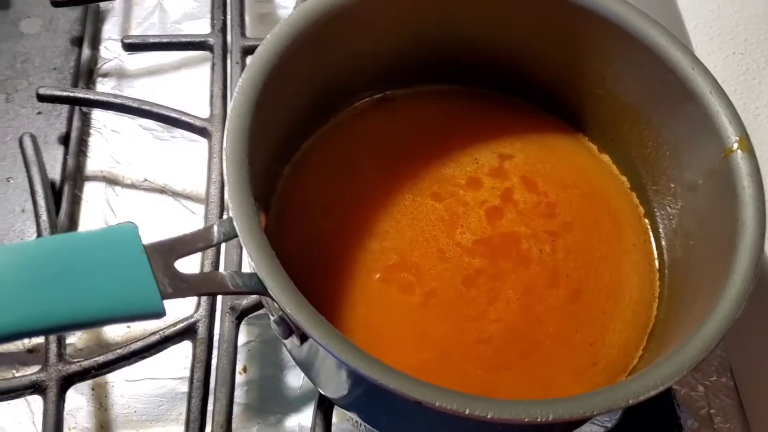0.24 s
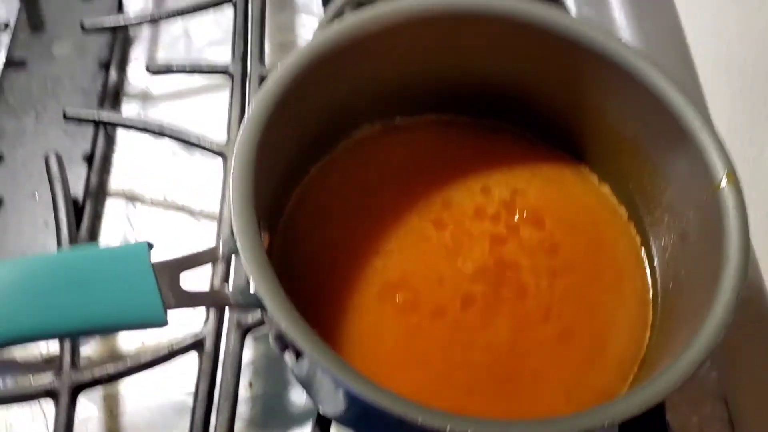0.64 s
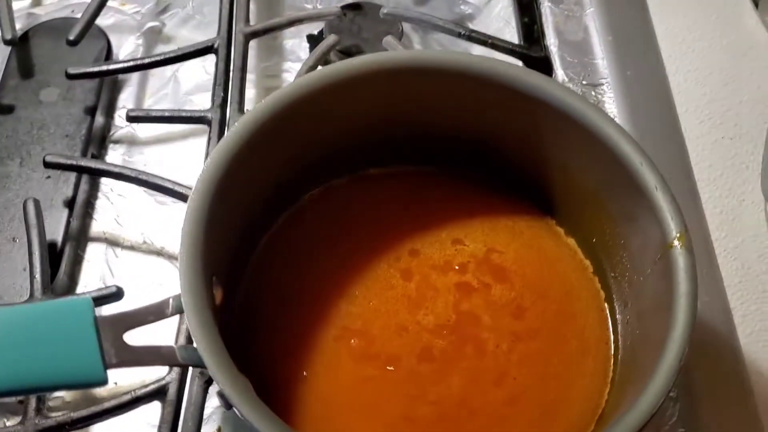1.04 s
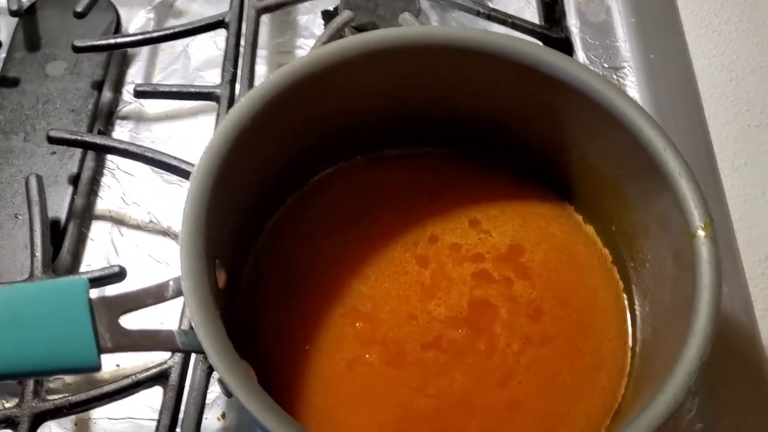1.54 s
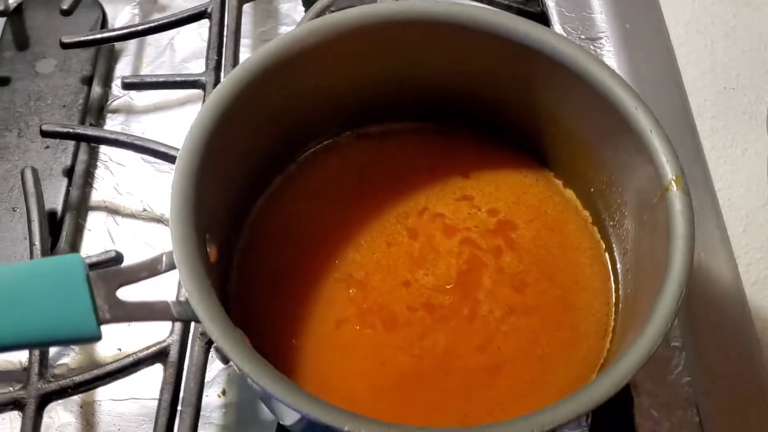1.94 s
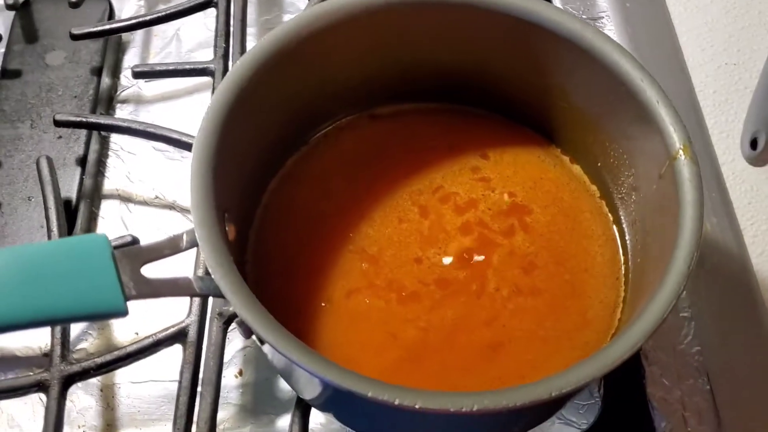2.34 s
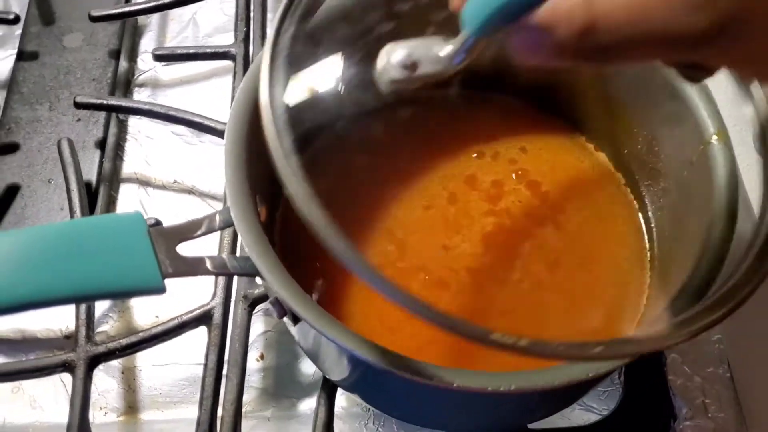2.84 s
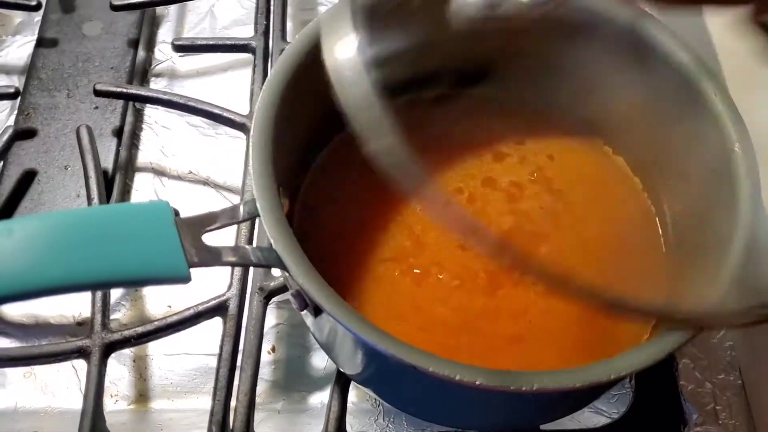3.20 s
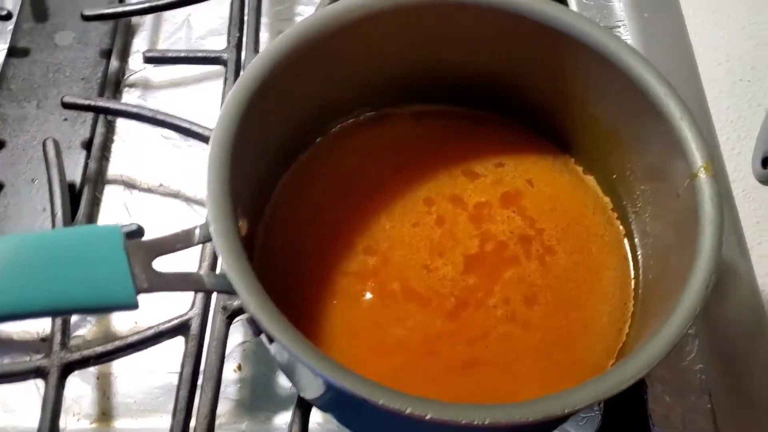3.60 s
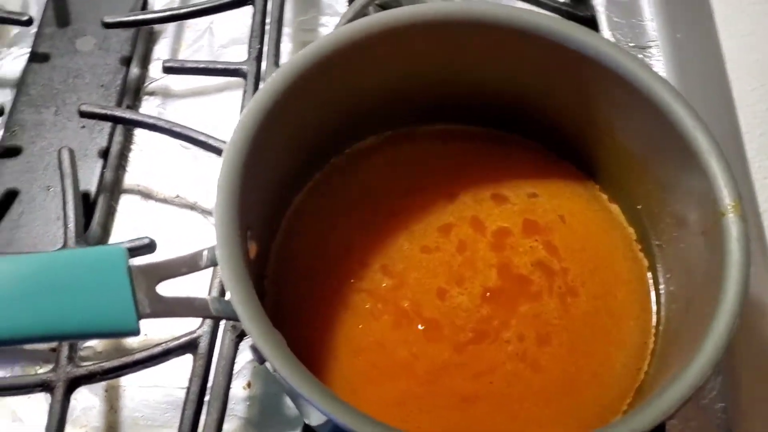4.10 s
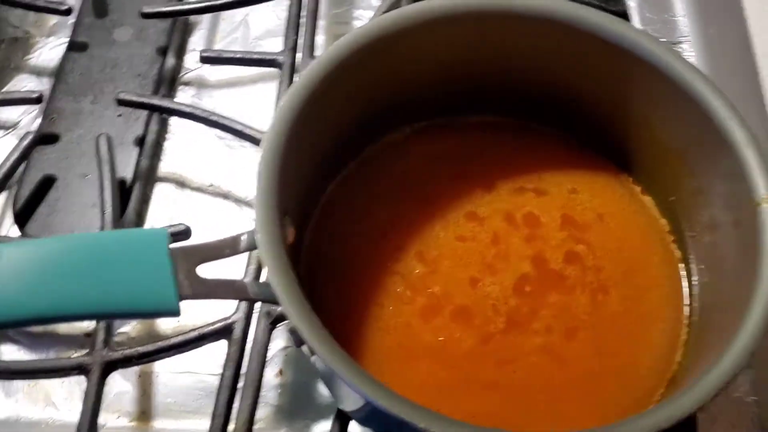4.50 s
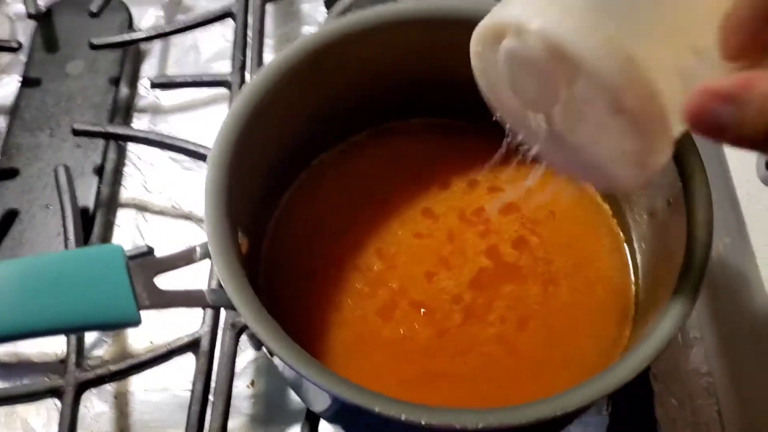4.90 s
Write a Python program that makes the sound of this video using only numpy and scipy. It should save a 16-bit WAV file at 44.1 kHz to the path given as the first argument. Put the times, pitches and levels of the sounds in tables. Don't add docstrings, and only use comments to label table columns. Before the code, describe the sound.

Cupboard hinge squeaks faintly, jars knock on a hollow worktop, a glass lid lands with loud clattering, then dry seasoning is shaken in quick bursts.

```python
import sys
import numpy as np
from scipy import signal
from scipy.fft import rfft, irfft, next_fast_len
from scipy.io import wavfile
from scipy.ndimage import uniform_filter1d, map_coordinates

SR = 44100
rng = np.random.default_rng(int(sys.argv[2]) if len(sys.argv) > 2 else 0)


def put_to_file(sound):
    columns = np.atleast_2d(sound).T
    safe = np.clip(columns, -1, 1)
    whole_steps = np.round(safe * 32767)
    wavfile.write(sys.argv[1], SR, whole_steps.astype(np.int16))


def volts(x):
    e = np.asarray(x, float) / 20
    return 10 ** e


N = 227115


def unit(x):
    return x / np.sqrt(np.mean(x ** 2) + 1e-20)


def along(points, hz):
    f, v = np.transpose(points)
    return np.interp(np.log(hz + 1), np.log(f + 1), v)


def curves(rows):
    s, *cols = np.transpose(rows)
    return [np.interp(np.arange(N) / SR, s, c) for c in cols]


def during(rows, fade=0.054):
    first, last = rows[0][0], rows[-1][0]
    return np.interp(np.arange(N) / SR, [first - fade, first, last, last + fade], [0, 1, 1, 0])


def wobble(rate):
    coarse = np.arange(0, N + 64, 64)
    knots = rng.standard_normal(int(N * rate / SR) + 4)
    return np.interp(np.arange(N), coarse, map_coordinates(knots, [coarse * rate / SR]))


def shaped(x, spectrum):
    m = next_fast_len(x.shape[-1] + 8192)
    gain = volts(along(spectrum, np.fft.rfftfreq(m, 1 / SR)))
    return irfft(rfft(x, m) * gain, m)[..., :x.shape[-1]]


def coloured(x, spectrum):
    return unit(shaped(x, spectrum))


def rippled(spectrum, depth_db, apart_hz):
    hz = np.arange(apart_hz, SR / 2, apart_hz)
    return np.transpose([hz, along(spectrum, hz) + depth_db * rng.standard_normal(len(hz))])


def pair(n, alike):
    a, b = rng.standard_normal((2, n))
    turn = np.arccos(np.clip(alike, -1, 1)) / 2
    shared, differing = np.cos(turn) * a, np.sin(turn) * b
    return np.array([shared + differing, shared - differing])


def rush(spectrum, alike, patchy_db):
    z = signal.stft(pair(N, alike), nperseg=512)[2]
    field = uniform_filter1d(rng.standard_normal(z.shape[1:]), 6, 0)
    field = uniform_filter1d(field, 10, 1)
    patched = signal.istft(z * volts(patchy_db * unit(field)), nperseg=512)[1][:, :N]
    return coloured(patched, spectrum)


def swells(rows, edge, linger=1.22):
    s, half, db = np.transpose(rows)[:, :, None]
    coarse = np.arange(0, N + 64, 64)
    away = (coarse / SR - s) / half
    strokes = volts(db) * np.exp(-np.maximum(-away, away / linger) ** edge)
    return np.interp(np.arange(N), coarse, np.sum(strokes, axis=0))


def add(out, s, sound, pan_db):
    out[:, round(s * SR):][:, :sound.shape[1]] += sound * volts([[pan_db / 2], [-pan_db / 2]])


def ringing(modes, t, spread, scatter_db):
    hz, db, t60 = np.transpose(modes)
    draw = rng.standard_normal((4, len(modes)))
    swing = np.exp(np.outer(2j * np.pi * hz * (1 + 0.014 * draw[0]) - np.log(1000) / t60, t))
    phase = 0.65 * draw[3] + spread * (1 + 0.36 * draw[2]) * [[-1], [1]]
    ring = (volts(db + scatter_db * draw[1]) * np.exp(1j * phase) @ swing).imag
    return ring / np.abs(ring).max()


def room(x):
    # frequency_hz, t60_s
    walls = [(150, 0.19), (600, 0.25), (3000, 0.21), (12000, 0.1)]
    out, step = np.zeros((2, N + SR)), SR // 5
    for start in range(0, N, step):
        hz, t, z = signal.stft(pair(SR // 3, 0.75), SR, nperseg=256)
        decay = volts(-60 * t / along(walls, hz)[:, None])
        tail = signal.istft(z * decay, SR, nperseg=256)[1]
        wet = signal.fftconvolve(x[:, start:start + step], tail / np.linalg.norm(tail[0]), axes=1)
        add(out, start / SR + .004, wet, 0)
    return out[:, :N]


def hum():
    # frequency_hz, density_db (per Hz)
    rumble_spectrum = [(13, -27), (22, -19.5), (33, -9.5), (54, 4), (121, -6), (150, -23), (200, -18),
                       (330, -120)]
    # frequency_hz, density_db (per Hz)
    drone_spectrum = [(88, -56), (150, -11.5), (198, -18.5), (236, -3.5), (461, -5.5), (486, -7.5),
                      (641, -8.5), (750, -10.5), (1200, -26.5), (1560, -22.5), (2640, -120)]
    # middle_s, half_length_s, rumble_db, drone_db
    shudders = [
        (2.083, 0.15, -71, -74),
        (3.15, 0.18, -66, -64.5),
        (3.793, 0.12, -55, -43.5),
    ]
    steady_db = -64
    deep = volts(steady_db) + swells([(s, half, db) for s, half, db, _ in shudders], edge=1.8)
    boxy = volts(steady_db) + swells([(s, half, db) for s, half, _, db in shudders], edge=2.4)
    rumble = deep * volts(2.5 + 0.84 * wobble(4.13)) * coloured(pair(N, 0.97), rumble_spectrum)
    drone = boxy * volts(2 + 1.5 * wobble(4.8)) * rush(drone_spectrum, 0.76, patchy_db=2.0)
    return (rumble + drone) * volts([[-.8], [.8]])


def hands():
    # middle_s, half_length_s, level_db
    brush = [(.25, .04, -73), (.47, 0.083, -63.5), (.65, 0.11, -62.5), (1.52, 0.066, -59.5),
             (2.39, 0.054, -67.5), (2.89, 0.051, -67), (3.41, 0.039, -54), (4.12, 0.13, -66),
             (4.3, 0.047, -66), (4.375, 0.022, -54.5), (4.448, 0.024, -53.5)]
    # frequency_hz, density_db (per Hz)
    cloth = [(2650, -39), (4500, -11.5), (6770, -4), (7570, -3), (8550, -10.5), (11500, -4.5),
             (14900, -10.5), (16000, -1)]
    # middle_s, half_length_s, level_db
    scuffs = [(.92, 0.039, -50), (1.42, 0.15, -70.5), (2.15, 0.035, -51), (2.39, 0.084, -79),
              (3.4, 0.18, -71), (3.75, 0.081, -47.5), (3.91, 0.052, -56.5), (4.78, 0.32, -66)]
    # frequency_hz, density_db (per Hz)
    scuff_spectrum = [(530, -14.5), (900, -11), (967, -3.5), (1350, -5), (2570, -7), (2800, -1.5),
                      (3190, -6.5), (4450, -14.5), (5140, -18), (12300, -29.5), (15600, -29)]
    steady_db = -68.5
    hiss = swells(brush, edge=1.7) * volts(0.5 + 0.74 * wobble(31)) * rush(cloth, 0, patchy_db=2)
    scuffing = (volts(steady_db) + swells(scuffs, edge=1.63)) * volts(5.5 + 0.57 * wobble(26.1))
    dull = rush(rippled(scuff_spectrum, depth_db=1.3, apart_hz=93.0), 0, patchy_db=3.0)
    return hiss + scuffing * dull


def ticks():
    # start_s, peak_db, pitch_hz
    pops = [(0.169, -47.5, 850), (0.31, -50, 750), (0.361, -47.5, 1070), (0.503, -39.5, 770),
            (0.537, -46.5, 900), (1.201, -51.5, 900), (1.268, -52, 704), (1.303, -37, 1020),
            (2.379, -47, 770), (3.472, -48, 730), (4.342, -41, 742)]
    # start_s, peak_db, lowest_resonance_hz, width_octaves
    grit = [(0.018, -45, 1250, 0.34), (0.025, -44.5, 1390, 1.23), (0.095, -50.5, 1290, 1.2),
            (0.105, -57, 1420, 0.76), (0.23, -56, 2160, 0.85), (1.197, -58, 975, 1),
            (1.26, -30.5, 1350, 0.52), (1.266, -42.5, 2690, 0.58), (1.281, -38.5, 1350, 0.92),
            (1.298, -33, 1300, 0.52), (1.295, -47, 2900, 0.3), (1.337, -42.5, 2900, 0.4),
            (1.338, -37.5, 1300, 0.32), (1.359, -46.5, 1700, 0.27), (2.613, -43, 1760, 0.74),
            (2.633, -48, 2500, 0.25), (2.641, -53, 2490, 0.25), (3.002, -51, 2300, 0.6),
            (3.288, -57, 1220, 0.56), (4.36, -43.5, 2660, 1.14)]
    # start_s, peak_db, lowest_hz, width_octaves
    snaps = [(.248, -63, 6500, .8), (0.438, -38.5, 7800, 0.2), (1.116, -64, 6040, 0.84),
             (1.3245, -39, 13500, 0.34), (1.862, -32.5, 8360, 0.2), (1.336, -46, 12700, 0.42),
             (1.325, -47.5, 9540, 0.12), (1.817, -56, 14000, .3), (1.842, -47, 6000, 1.3),
             (1.8615, -52, 12000, .5), (1.9, -52, 4040, 1.1), (1.921, -58, 13000, .35),
             (2.197, -47, 8050, .9), (2.592, -58, 7320, 0.17), (2.742, -68, 12000, .5),
             (3.394, -55, 9000, .6), (3.6693, -30.5, 7900, 2.8), (3.699, -33, 7960, 1),
             (3.816, -21.5, 9450, 1), (3.841, -21, 6060, 1.3), (3.002, -47, 3020, 0.48),
             (0.8162, -48, 5000, 1.2), (2.069, -59, 11000, 1), (2.241, -52, 6500, 0.61),
             (2.4857, -56, 8000, .3), (2.592, -55, 12700, .25), (2.613, -54, 12400, .3),
             (2.617, -52, 5460, 0.46), (2.622, -53, 6460, 1.2), (2.689, -55.5, 5600, 1.6),
             (2.981, -63, 5000, 1.1), (3.383, -48, 11500, 1.4), (3.516, -54.5, 6200, 0.88),
             (4.364, -44, 6950, 0.44), (4.4438, -50, 10100, 1)]
    # start_s, peak_db, lowest_hz, width_octaves, length_s
    slides = [(2.087, -43, 400, 0.2, 0.28), (1.262, -42.5, 1460, 1.07, 0.42),
              (2.879, -66, 1383, 0.037, 0.66), (3.004, -44.5, 338, 2.16, 0.12),
              (3.183, -48.5, 1250, 0.92, 0.26), (3.255, -55, 1200, 0.59, 0.53),
              (3.496, -62, 2270, 0.089, 0.37)]
    grit_cycles, snap_s = 84, 0.014
    out, t = np.zeros((2, N + SR)), np.arange(SR // 5) / SR
    front = np.sin(np.pi * np.clip(t / 0.00085, 0, .5))
    for s, db, hz in pops:
        pop = ringing([(hz, 0, .025)], t, spread=0.41, scatter_db=5.5)
        add(out, s, volts(db) * front * pop, -4)
    short = [(*row, grit_cycles / row[2]) for row in grit] + [(*row, snap_s) for row in snaps]
    for s, db, hz, width, length in short + slides:
        skirt = [(-.9, -40), (-.4, -6), (0, 0), (1, -4), (1.39, -20), (1.9, -45), (3.2, -75)]
        band = [(hz * 2 ** (widths * width), level_db) for widths, level_db in skirt]
        burst = coloured(pair(len(t), 0.1297), rippled(band, depth_db=4.0, apart_hz=0.062 * hz))
        rise = 1 - np.exp(-t / (0.037 * length))
        add(out, s, volts(db + 4 - 60 * t / length) * burst * rise, -3)
    return out[:, :N]


def hinge():
    # multiple_of_slip_rate, level_db
    overtones = [(1, -9), (2, -14), (3, -11), (4, -10), (5, 9), (6, -8), (7, -6), (8, -3), (9, -3),
                 (10, -11), (11, -11), (12, -2), (13, -10), (16, -25)]
    # time_s, pitch_hz, level_db
    squeaks = [
        [(0.355, 2590, -75), (0.398, 2545, -64), (0.435, 2520, -67), (0.476, 2505, -60), (0.5, 2495, -67),
         (0.535, 2485, -73)],
    ]
    hz, db = curves(np.vstack(squeaks))
    turns = np.cumsum(hz / 5 * (1 + .007 * wobble(90))) / SR
    brighten_db = 9 * (np.arange(N) / SR - .48).clip(-.15, .05)
    tone = 0
    for k, level_db in overtones:
        swell = volts(level_db + brighten_db * (k - 5) + 4 * wobble(30))
        tone = tone + swell * np.sin(2 * np.pi * k * turns)
    moving = sum(during(squeak, fade=0.03) for squeak in squeaks)
    return tone * volts(db) * moving * volts([[-1.5], [1.5]])


def whistles():
    # middle_s, half_length_s, level_db, centre_hz, width_octaves
    cap_holes = [(4.603, .03, -51, 4730, .08), (4.638, 0.045, -58, 1250, 0.2),
                 (4.767, 0.022, -57, 2500, .08), (4.829, 0.025, -48.5, 1340, 0.073),
                 (4.834, 0.019, -42.5, 2690, 0.13), (4.907, 0.019, -46, 5480, .04),
                 (4.898, 0.014, -47, 2850, .06), (4.918, 0.015, -48.5, 3290, .06),
                 (5.045, .02, -50, 2100, .08), (5.055, 0.02, -49, 3500, .05)]
    # middle_s, half_length_s, level_db, centre_hz, width_octaves
    chatter = [(0.829, 0.017, -45.5, 1090, 0.29), (0.97, 0.01, -50, 1240, 0.22),
               (2.6, 0.019, -56, 130, 0.28), (3.3, 0.044, -58, 125, 0.22), (3.4, 0.039, -54, 380, 0.39),
               (3.683, .01, -34, 1600, 0.28), (3.715, 0.013, -34, 1600, 0.38),
               (3.75, 0.018, -38.5, 1530, 0.31), (3.826, .012, -35, 1900, .25),
               (3.85, 0.018, -27.5, 1500, .35), (3.685, 0.018, -23.5, 230, 0.5),
               (3.915, 0.03, -32.5, 700, .4), (2.39, .035, -60, 3360, 0.58), (.9, 0.019, -30, 640, 0.3),
               (3.015, 0.015, -47, 810, 0.52), (0.425, 0.087, -63, 310, 0.45)]
    out = np.zeros((2, N))
    for s, half, db, hz, width in cap_holes + chatter:
        skirt = [(-3, -45), (-1, -6), (0, 0), (1, -6), (3, -45)]
        band = [(hz * 2 ** (widths * width), level_db) for widths, level_db in skirt]
        noise = pair(N, np.clip(350 / hz, 0.3, .95))
        out = out + swells([(s, half, db)], edge=2.3) * coloured(noise, band)
    return out


def clinks():
    # start_s, peak_db, pitch_hz, t60_s
    clicks = [(.438, -46, 5200, 0.022), (.438, -45, 6550, .02), (1.265, -29, 2740, 0.016),
              (1.2685, -29.5, 1560, .03), (1.293, -39, 2150, .03), (1.3373, -25.5, 2950, 0.013),
              (2.6095, -46, 3000, .012), (2.6117, -37.5, 2770, .014), (2.6133, -26.5, 2830, 0.015),
              (2.6165, -33, 2950, .02), (2.6195, -39, 1860, 0.028), (2.6257, -28.5, 2790, 0.017),
              (2.6298, -33, 2640, .016), (3.003, -42, 3150, 0.039), (3.186, -48, 1900, .02),
              (.4375, -40, 12200, 0.0056), (.4375, -41, 14600, .006), (1.316, -36, 300, 0.038),
              (.8825, -12, 513, 0.041), (.891, -17, 430, .04), (3.0035, -26, 420, .04),
              (3.699, -7.5, 457, .04), (3.7385, -14.5, 620, .04), (1.845, -18.5, 341, 0.087),
              (2.9525, -49, 900, .03), (1.271, -44, 3900, .02)]
    out, t = np.zeros((2, N + SR)), np.arange(SR // 10) / SR
    front = 1 - np.exp(-t / 0.00034)
    for s, db, hz, t60 in clicks:
        ring = ringing([(hz, 0, t60), (1.12 * hz, -10, t60)], t, spread=0.36, scatter_db=6.0)
        add(out, s, volts(db) * front * ring, -3)
    return out[:, :N] + room(volts(-12.5) * out[:, :N])


def notes():
    # start_s, peak_db, pitch_hz, t60_s, rise_s
    jar_notes = [(0.73, -44.5, 250, 0.099, 0.0025), (.729, -46, 544, 0.04, .003),
                 (0.767, -47, 242, 0.091, .004), (.815, -27.5, 203, 0.1, .004),
                 (.817, -27.5, 529.3, 0.23, 0.008), (.891, -10.5, 593, 0.021, 0.0011),
                 (.895, -33, 382, 0.33, 0.0046), (.955, -22.5, 526, 0.078, 0.0035),
                 (.98, -42, 545, 0.08, .004), (1.268, -43.5, 712, 0.26, 0.0066),
                 (1.709, -37, 137, .15, 0.0083), (1.775, -30.5, 718, 0.052, 0.0024),
                 (1.82, -32, 1485, 0.057, .002), (1.853, -25, 1460, 0.064, 0.0025),
                 (1.875, -43, 386.4, .35, 0.0085)]
    # start_s, peak_db, pitch_hz, t60_s, rise_s
    pot_notes = [(2.952, -56, 1250, 0.037, .001), (3.0035, -27, 350, 0.16, 0.0011),
                 (3.0035, -27.5, 440, 0.074, .001), (3.004, -35, 290, 0.18, 0.001),
                 (3.004, -36.5, 584, 0.092, 0.00093), (3.005, -43, 1166, .12, 0.0023),
                 (3.004, -38.5, 1297, 0.11, .002), (3.003, -43, 2600, 0.056, 0.0009),
                 (3.041, -39, 117, 0.25, 0.033), (3.185, -53, 1520, .08, .002)]
    # start_s, peak_db, pitch_hz, t60_s, rise_s
    lid_notes = [(3.669, -12, 836, 0.071, .002), (3.669, -18.5, 6150, 0.025, .001),
                 (3.676, -24, 1653, 0.04, .003), (3.699, -14, 864, 0.088, .002),
                 (3.738, -14, 815, 0.052, .001), (3.791, -24, 1530, 0.047, .002),
                 (3.807, -16.5, 724, 0.072, .001), (3.815, -22.5, 1880, 0.065, .003),
                 (3.841, -3, 549, 0.05, .001), (3.843, -20, 1720, 0.032, .001),
                 (3.842, -17, 1077, 0.043, .001), (3.88, -22, 1487, 0.12, .006),
                 (3.901, -37, 382.5, 0.25, .01), (3.885, -17.5, 707, 0.12, .004)]
    out, t = np.zeros((2, N + SR)), np.arange(SR // 3) / SR
    for s, db, hz, t60, rise in jar_notes + pot_notes + lid_notes:
        ring = ringing([(hz, 0, t60), (1.03 * hz, -9, t60)], t, spread=0.3, scatter_db=2.0)
        add(out, s, volts(db) * (1 - np.exp(-t / rise)) * ring, -2.5)
    return out[:, :N] + room(volts(-10.5) * out[:, :N])


def contacts():
    # start_s, body_peak_db, thud_db, rim_db, clatter_db
    jars = [(.73, -43, -15, -26, -14), (0.748, -47, 0, -23, -7), (.816, -30, -4.5, -7, -7),
            (0.838, -31, -9, -2, -11.5), (0.862, -26, 1.5, -4, -12), (.882, -11, -9.5, -2.5, -19),
            (.903, -26, 1, -5, -10), (.924, -25, -4, -28, -31), (.942, -18, -5, -7.5, -21.5),
            (1.315, -42, -4.5, 3, -5), (1.593, -38.5, 7, -28, -28), (1.727, -27, 1, -18, -33),
            (1.744, -42, -11, -9, -32), (1.778, -23, -3.5, -14, -24), (1.793, -36, -2, -22, -17),
            (1.81, -29, 4, -12, -13), (1.826, -17, -9, -11.5, -15.5), (1.843, -11, -8.5, -13, -17.5),
            (1.861, -22, -8, -7.5, -5), (2.141, -12.5, -12.5, -3.5, -28), (2.159, -21.5, -3, -5.5, -15.5),
            (2.168, -33, 0.5, 10, -7.5), (2.197, -23.5, -5.5, -0.5, -12.5), (2.218, -34.5, 3, -11, -18)]
    # start_s, body_peak_db, thud_db, rim_db, clatter_db
    pot = [
        (2.952, -44, -14, -9, -28),
        (3.003, -24.5, -6, -11, -23.5),
        (3.035, -39, -1, -12, -43),
        (3.062, -55, -7.5, -25, -37),
    ]
    # start_s, body_peak_db, thud_db, rim_db, clatter_db
    lid = [(3.669, -2, -11, -9.5, -17.5), (3.699, -8.5, -8, -6, -16), (3.719, -19, -5, -11.5, -34),
           (3.738, -7.5, -14.5, -14, -25), (3.76, -11.5, -10.5, -11.5, -21.5),
           (3.773, -17, -12.5, -21, -19), (3.79, -18, -24, -7, -13), (3.807, -16.5, -10, 0, -12),
           (3.815, -17.5, -13, -1.5, -1.5), (3.822, -22, -32, -1.5, 4.5), (3.841, -8.5, -14.5, -4.5, -11),
           (3.861, -11.5, -8.5, -2.5, -10), (3.878, -14, -17, -5.5, -16.5), (3.888, -12, -17.5, -18, -14.5),
           (3.904, -14.5, -12, -9, -25)]
    blow_hz, rock_hz, pot_hz = 462, 405.6, 374
    rock_s, rock_db, dull_db = .0095, -10, -5.5
    blows = [(*row, blow_hz) for row in jars + lid] + [(*row, pot_hz) for row in pot]
    rocks = []
    for s, db, thud_db, rim_db, clatter_db, hz in blows:
        later = s + rock_s * (1 + .2 * rng.standard_normal())
        rocks.append((later, db + rock_db, thud_db, rim_db + dull_db, clatter_db + dull_db, min(hz, rock_hz)))
    return blows + rocks


def bumps():
    # pitch_hz, level_db, t60_s
    worktop = [(96.1, -11, 0.13), (130.5, -1.5, 0.098), (187.4, -1.5, 0.089), (242.8, -10.5, 0.12),
               (293, -7, 0.19), (386.4, -2, 0.17), (422, -9.5, 0.12), (520.2, 3, 0.069), (548, 0.5, 0.05),
               (646, -4.5, 0.097), (724, -7.5, 0.079), (814, -11, 0.081), (952, -4.5, 0.028)]
    # pitch_hz, level_db, t60_s
    rim_modes = [(1071, -11.5, 0.082), (1250, -4.5, 0.057), (1415, 2.5, 0.024), (1460, 0, 0.027),
                 (1700, -3, 0.016), (1900, -18, 0.03), (2210, -14, 0.013)]
    # pitch_hz, level_db, t60_s
    glass_modes = [(2360, -7.5, 0.055), (2900, -2, 0.062), (3560, -21, 0.068), (4490, -5.5, 0.068),
                   (5900, -18.5, 0.02), (7290, 2, 0.027)]
    # frequency_hz, density_db (per Hz)
    clatter_spectrum = [(1180, -8), (2000, -7.5), (2090, -5), (3490, -1), (4010, -6), (4410, -7.5),
                        (5300, -9.5), (14800, -26), (16000, -20.5)]
    # frequency_hz, gain_db
    under = [(40, -50), (78, -14.5), (98, 1.5)]
    scrape_spectrum = [(250, -35.0), (700, 11.0), (1000, 1.5), (1600, -10.0), (2300, -10.5), (3500, -60.0)]
    out, t = np.zeros((2, N + SR)), np.arange(SR // 6) / SR
    rise, loosen = 1 - np.exp(-t / 0.0015), 1 - np.exp(-t / 0.0031)
    loose = coloured(pair(SR, -0.074), rippled(clatter_spectrum, depth_db=-3.0, apart_hz=178.8))
    rough = coloured(pair(SR, -0.12), scrape_spectrum)

    def piece(noise):
        return noise[:, rng.integers(SR - len(t)):][:, :len(t)]

    pressed = 0.51 + 0.86 * np.exp(-t / 0.011)
    for s, db, thud_db, rim_db, clatter_db, centre in contacts():
        favoured = [(hz, level_db - 10.0 * np.log2(hz / centre) ** 2, t60) for hz, level_db, t60 in worktop[4:]]
        thud = volts(thud_db) * ringing(worktop[:4], t, spread=0.087, scatter_db=4.0)
        body = pressed * ringing(favoured, t, spread=0.37, scatter_db=3.5)
        scrape = volts(-13.5 - 60 * t / 0.14) * piece(rough)
        rim = ringing(rim_modes, t, spread=1.0, scatter_db=3.5) + scrape
        rim = volts(rim_db) * volts([[-1.5], [1.5]]) * rim
        glass = volts(clatter_db - 7.0) * ringing(glass_modes, t, spread=0.61, scatter_db=5.5)
        clatter = loosen * volts(clatter_db - 1.0 - 60 * t / 0.059) * piece(loose)
        add(out, s, volts(db + 1.5) * rise * (thud + body + rim + glass + clatter), -2.5)
    return shaped(out[:, :N], under)


def shaker():
    # frequency_hz, density_db (per Hz)
    grain_spectrum = [(880, -23), (1500, -51), (1720, -15), (2440, -4), (4120, -7), (5440, -6), (9280, -14),
                      (14900, -14.5), (16000, -19.5)]
    # middle_s, half_length_s, grains_db, hollow_db (the jar's cavity, re grains)
    jerks = [
        (4.613, 0.042, -40.5, -22),
        (4.776, 0.021, -45, -11),
        (4.834, 0.021, -44, -7),
        (4.911, 0.033, -42, -18),
        (5.043, 0.025, -40.5, -19),
        (5.155, 0.014, -38, -23),
    ]
    hollow_spectrum = [(800, -14.5), (1100, -1.0), (1400, 6.0), (2400, -16), (3200, -34.5)]
    strikes = pair(N, 0) * (1 + 3.2 * (rng.random((2, N)) < .03))
    hollow = rush(hollow_spectrum, 0.27, patchy_db=5.5)
    grains = coloured(strikes, rippled(grain_spectrum, depth_db=1.5, apart_hz=204.5))
    thrown = swells([(s, half, db) for s, half, db, _ in jerks], edge=1.48, linger=1.69)
    booming = swells([(s, half, db + hollow_db) for s, half, db, hollow_db in jerks], edge=1.7)
    return volts(2 + 0.92 * wobble(60)) * (thrown * grains + booming * hollow)


def scene():
    bumped, ticked = bumps(), ticks()
    reverberant = room(volts(-9.0) * bumped + volts(-9.0) * ticked)
    steady = hum() + hands()
    return steady + ticked + hinge() + whistles() + clinks() + notes() + bumped + reverberant + shaker()


def top_cut(x):
    return signal.sosfilt(signal.butter(12, 16520, fs=SR, output="sos"), x)


def record(dry):
    # frequency_hz, gain_db
    ports = [(15200, 0), (15600, -7), (15900, -24), (16600, -53)]
    soft = dry / (1 + np.abs(dry / .93) ** 6) ** (1 / 6)
    return top_cut(shaped(soft, ports))


dry = scene()
out = record(dry)
put_to_file(out)
```